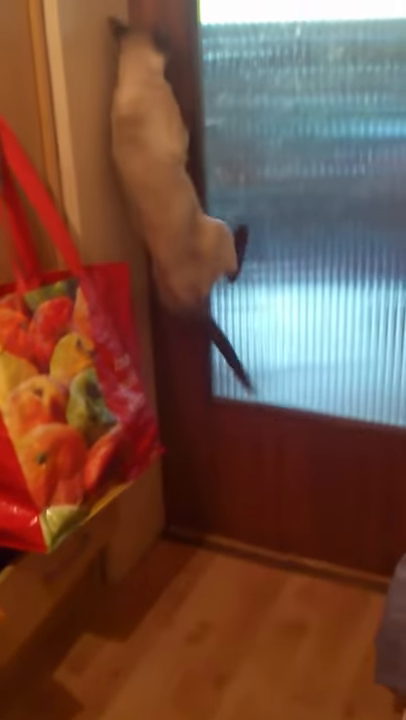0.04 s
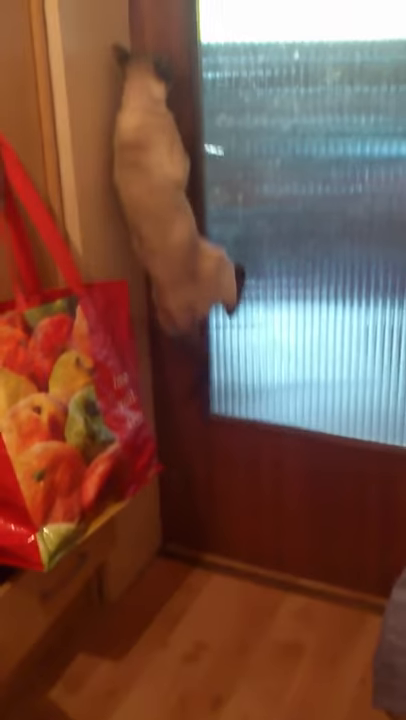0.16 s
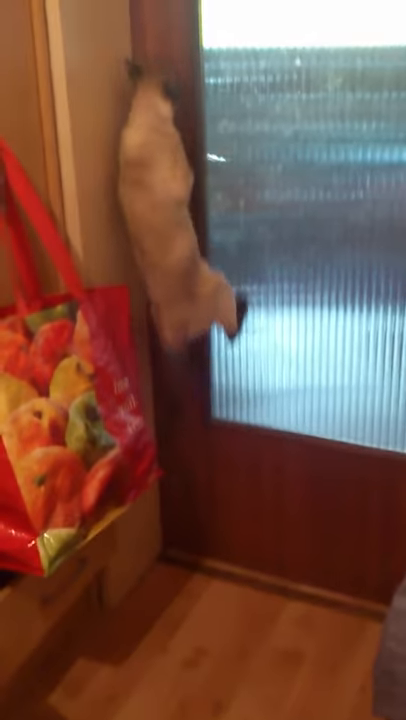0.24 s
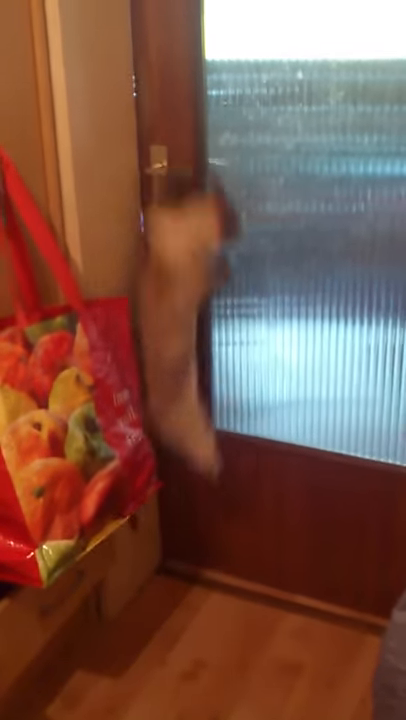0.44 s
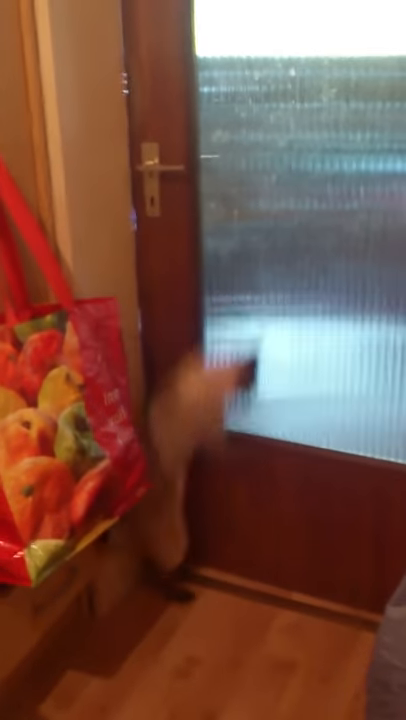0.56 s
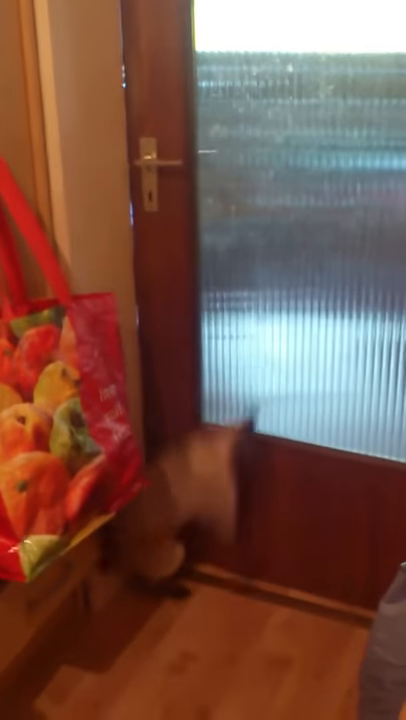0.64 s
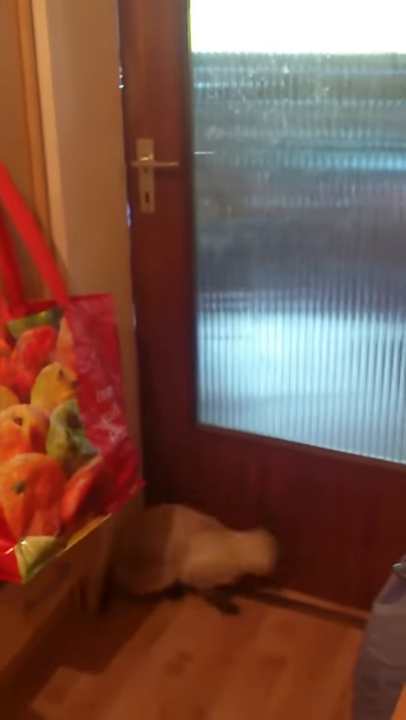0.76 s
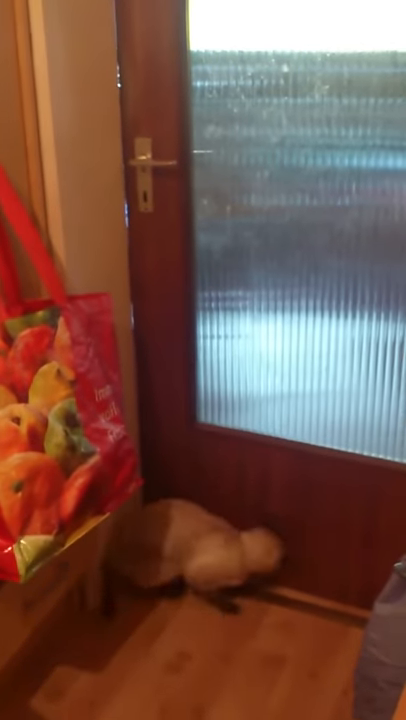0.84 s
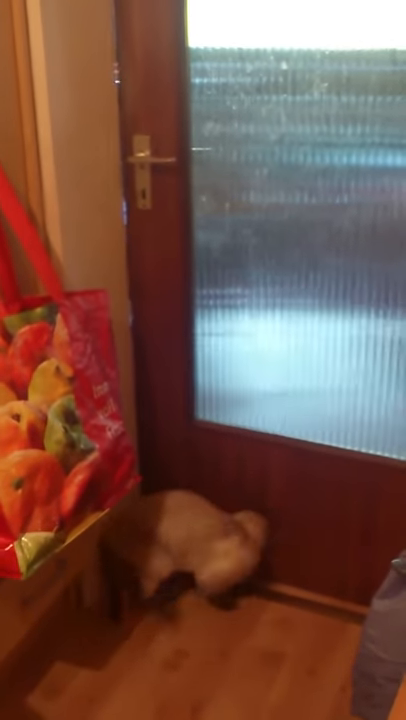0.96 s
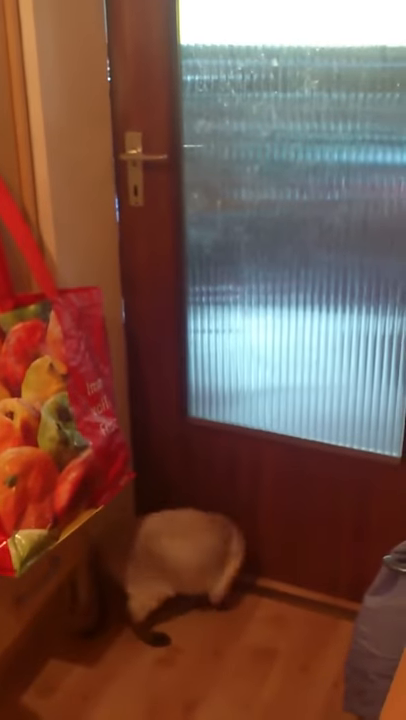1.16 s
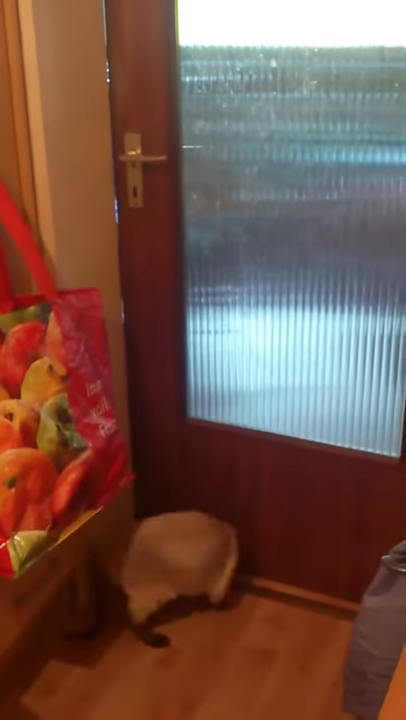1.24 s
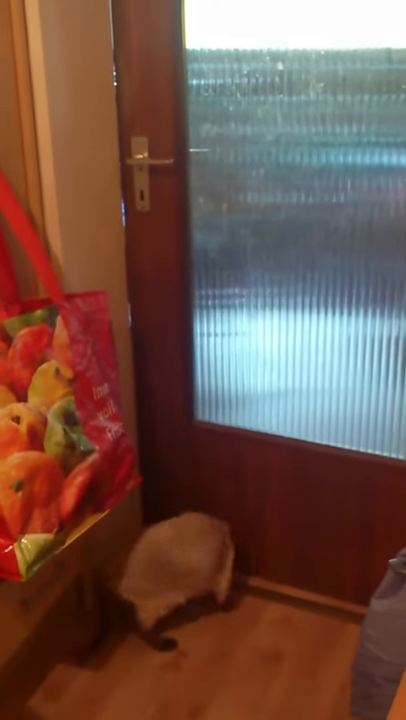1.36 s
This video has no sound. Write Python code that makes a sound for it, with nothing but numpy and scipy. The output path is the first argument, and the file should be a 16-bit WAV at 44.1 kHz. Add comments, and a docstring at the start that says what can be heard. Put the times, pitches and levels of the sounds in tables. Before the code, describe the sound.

A door handle creaks and clacks back as a cat drops off and lands.

```python
"""A cat drops from a door handle

A cat hangs from the handle of a glazed wooden door in a small hallway. The handle creaks by stick-slip
friction and the claws rasp off it. Impacts follow: the handle springs back, the latch clicks and the door
knocks in its frame. The cat lands front paws first, ringing the floor's modes, and takes a soft step.
A hand-held stereo recorder picks this up with a low rumble and faint hiss."""
import sys
import numpy as np
from scipy import signal
from scipy.fft import rfft, irfft
from scipy.io import wavfile
from scipy.ndimage import uniform_filter1d

SR = 44100
rng = np.random.default_rng(int(sys.argv[2]) if len(sys.argv) > 2 else 0)


def persist_wave(psi):
    """Save psi, clipped to +-1, as 16-bit WAV."""
    counts = np.round(np.clip(psi, -1, 1) * 32767).astype(np.int16)
    wavfile.write(sys.argv[1], SR, np.atleast_2d(counts).T)


N = 61739
FFT_SIZE = 65536
COHERENT_HZ = 815  # the two microphones hear alike below this


def claw_slide():
    """Sliding friction: claws scrape along the door as grainy noise."""
    # loudness of the scrape: time_s, level_db
    levels = [(0, -54.5), (.12, -59), (.19, -58), (.235, -49), (.27, -39), (.365, -50.5), (.46, -49),
              (.68, -60), (.73, -50.5), (.8, -64), (.88, -70)]
    # its spectrum: frequency_hz, gain_db
    spectrum = [(200, -1.5), (700, 8), (1500, -3), (3000, -2.5), (5000, 0.5), (7500, -2), (10000, 2),
                (12000, -6), (15500, -10.5)]
    grains = np.repeat(rng.standard_normal(N // 40 + 1), 40)[:N]
    grit = unit(np.exp(0.22 * grains))
    return unit(colour(diffuse() * grit, shape(spectrum))) * curve(levels)


def claw_slips():
    """Friction bursts: each slip has a band of rasp, lower for a slower claw."""
    # slips: start_s, level_db, rise_s, t60_s, rasp_hz
    slips = [(0.2636, -33.5, 0.0017, 0.19, 5030), (0.291, -34.5, 0.0023, 0.14, 2800),
             (0.3, -39.5, 0.0022, 0.18, 5000)]
    # spectrum beneath the rasp: frequency_hz, gain_db
    spectrum = [(450, -11), (700, -1), (1300, -4.5), (2000, -6.5), (5500, -2), (7500, -11), (10000, -8.5),
                (12000, -26), (15500, -48)]
    rasp_db, out = 5.5, 0
    for start, db, rise, t60, hz in slips:
        tone = shape(spectrum) + rasp_db * hump(freqs(), hz, octaves=0.23)
        out += burst(start, db, tone, rise, t60, crack=0)
    return out


def claw_clacks():
    """Hard contact: a brief force clacks and excites mainly the floor's high modes."""
    # claws striking the boards: start_s, level_db
    clacks = [(0.6535, -47), (0.6733, -42.5), (0.767, -51), (0.7694, -47.5)]
    # their spectrum: frequency_hz, gain_db
    spectrum = [(400, -5), (1000, -7.5), (1800, -2), (3100, -4), (4300, -3), (7000, -19.5), (10000, -11),
                (15500, -40)]
    contact = sum(burst(s, db, shape(spectrum), rise=0.00035, t60=0.21) for s, db in clacks)
    high_pass = lambda hz: 1 / (1 + (1500 / hz) ** 2)
    return contact + sum(undb(db - 2) * floor_boards(s, high_pass) for s, db in clacks)


def claw_ticks():
    """Light contact: claws touch down with bright, quickly damped ticks."""
    # touches: start_s, level_db, rise_s
    ticks = [(0.6522, -51.5, 0.00044), (0.6743, -45.5, 0.001), (0.804, -54.5, 0.00039),
             (0.991, -62.5, .006), (1.11, -59.5, 0.0025), (1.366, -65.5, 0.014)]
    # their spectrum: frequency_hz, gain_db
    spectrum = [(1000, -2.5), (3000, -8), (4500, 4.5), (7000, -2.5), (10000, 1), (12000, -7.5),
                (15500, -22)]
    return sum(burst(s, db, shape(spectrum), rise, t60=0.036) for s, db, rise in ticks)


def handle_creaks():
    """Stick-slip oscillation: the turning handle gives wavering tones and a rasp pulsed each cycle."""
    # creaks: start_s, length_s, pitch_hz, level_db
    creaks = [(0.207, 0.046, 550, -48.5), (0.265, 0.048, 675, -44.5)]
    jitter, overtone_db, rasp_db, rasp_hz = 0.037, -16, -2.5, 1960
    rasp_band = -10 * np.log10(1 + (2 * np.log2(freqs() / rasp_hz)) ** 6)
    out = 0
    for start, length, hz, db in creaks:
        phase = 2 * np.pi * np.cumsum(hz * (1 + jitter * wander(samples=150))) / SR
        tone = np.sin(phase) + undb(overtone_db) * sum(np.sin(k * phase) for k in range(2, 5))
        rasp = colour(diffuse() * (1 + np.sin(phase)), rasp_band)
        swell = abs(np.sin(np.pi * np.minimum(since(start) / length, 1)))
        out += undb(db) * (unit(tone) * np.sqrt(swell) + undb(rasp_db) * unit(rasp) * swell)
    return out


def handle_return():
    """Impact and rebound: the sprung handle hits its stop twice; the first hit rings the metal."""
    # hits on the stop: start_s, level_db
    hits = [(0.386, -25.5), (0.3914, -30.5)]
    # spectrum of the clack: frequency_hz, gain_db
    spectrum = [(570, -19.5), (740, -2), (860, 3), (1150, -5), (1650, -6), (2000, -17), (2400, -19),
                (2900, -8), (3700, -15), (4900, 1.5), (6200, -6), (7500, -13.5), (9000, -12), (10400, -8),
                (12000, -18.5), (15500, -30)]
    # modes of the metal: frequency_hz, gain_db, t60_s
    modes = [(793, -6, 0.2), (929, -3, 0.12), (2958, 2, 0.063), (4880, 3, 0.1), (5010, 3, .18),
             (5225, -16, 0.1), (5550, -1, 0.19), (10000, -7, 0.12)]
    clack = sum(burst(s, db, shape(spectrum), rise=0.00035, t60=0.2, crack=2.3) for s, db in hits)
    return clack + undb(-31.5) * ring(hits[0][0], modes, drive=lambda hz: 1)


def latch():
    """Impact: the latch clicks with sharp resonance peaks."""
    # spectrum of the click: frequency_hz, gain_db
    spectrum = [(200, -49), (600, -16), (850, -3.5), (1300, -15), (2500, -14.5), (3300, -2.5), (4700, 2.5),
                (5400, -7.5), (6100, -21), (6900, -24), (8100, 2.5), (9200, -5), (10500, -8.5),
                (11500, -17), (12500, -11.5), (15000, -33)]
    return burst(start=0.49, db=-31, tone=shape(spectrum), rise=0.0006, t60=0.22)


def frame_knock():
    """Impact: the door meets its frame in a broadband knock with a slower attack."""
    # spectrum of the knock: frequency_hz, gain_db
    spectrum = [(400, -22), (510, -2.5), (850, -3), (1300, -3.5), (2350, 1), (2800, -10.5), (3100, -4),
                (6300, -4.5), (7500, -12), (10000, -4), (12000, -16.5), (15500, -24.5)]
    return burst(start=0.538, db=-28, tone=shape(spectrum), rise=0.003, t60=0.18)


def door_leaf():
    """Free vibration: each jolt rings the leaf's modes, mainly those below the contact's cut-off."""
    # modes of the leaf: frequency_hz, gain_db, t60_s
    modes = [(89.8, -10, 0.9), (193.3, -14, .5), (309.3, -12.5, 0.36), (504.7, -2, 0.2),
             (628.7, -3.5, 0.17), (795, 2, 0.17), (937, -0.5, 0.29), (1028, 2, 0.32), (1506, 1, 0.2),
             (1985, 2, 0.15), (2162, -5, 0.083), (2330, -0.5, 0.17)]
    # jolts: start_s, level_db, cutoff_hz
    jolts = [(0.245, -30, 260), (0.295, -52, 2500), (0.541, -34.5, 5000)]
    return sum(undb(db) * ring(s, modes, lambda hz: 1 / (1 + (hz / cutoff) ** 2))
               for s, db, cutoff in jolts)


def paws():
    """Cushioned impact: each paw thuds and rings the boards; a softer contact gives a lower thud."""
    # footfalls: start_s, level_db, centre_hz, t60_s
    footfalls = [(0.654, -38.5, 693, 0.16), (0.6649, -42, 284, 0.067), (0.675, -42, 1220, 0.17),
                 (0.7701, -47, 890, 0.068), (0.779, -43.5, 256, 0.099), (1.1109, -50, 246, 0.099)]
    skirt_db, out = -33, 0
    for start, db, centre, t60 in footfalls:
        force = lambda hz: hump(hz, centre, octaves=0.71) + undb(skirt_db) / (1 + (hz / centre / 4) ** 2)
        out += burst(start, db, 20 * np.log10(force(freqs())), rise=0.00049, t60=t60)
        out += undb(db - 3) * floor_boards(start, force)
    return out


def floor_boards(start, drive):
    """Damping under load: the floor rings freely until the cat's full weight rests on it."""
    # modes of the boards: frequency_hz, gain_db, t60_s
    modes = [(95, 12.5, 0.26), (198.6, 2.5, 0.79), (248, 1, 0.12), (298.3, 11.5, 0.18), (389.6, 6, 0.12),
             (433.6, 12, 0.13), (565, 4.5, 0.21), (845.7, 8, .17), (1839, 6, 0.13), (2390, 2.5, .15),
             (3710, -2, 0.2)]
    loaded_s = 0.765
    return ring(start, modes, drive) * fade(since(max(start, loaded_s)), t60=0.26)


def door_sway():
    """Air displacement: the swaying door makes slow, uneven swings of pressure."""
    # strength of the swings: time_s, level_db
    levels = [(0, -58), (.19, -46), (.235, -43), (.27, -27), (.33, -43.5), (.45, -49), (.65, -53.5),
              (.9, -65.5)]
    sway_hz = 23.88 * (1 + 0.276 * wander(samples=1200))
    return unit(np.sin(2 * np.pi * np.cumsum(sway_hz) / SR)) * curve(levels)


def rumble():
    """Amplitude-modulated noise: a low rumble swells and ebbs."""
    # loudness of the rumble: time_s, level_db
    levels = [(0, -51), (.19, -57.5), (.27, -38), (.35, -50.5), (.5, -56), (.8, -52.5), (.92, -71),
              (1.4, -68)]
    # its spectrum: frequency_hz, gain_db
    spectrum = [(20, -11), (40, -5), (52, -16.5), (90, 3.5), (140, -7.5), (300, -19), (1000, -51.5)]
    return unit(colour(diffuse(), shape(spectrum))) * curve(levels)


def hiss():
    """Stationary noise: a faint, steady floor of sound."""
    # spectrum of the noise floor: frequency_hz, gain_db
    spectrum = [(35, -36), (60, -0.5), (142, -8.5), (308, -2.5), (354, -9), (3040, -18), (4970, -18),
                (10500, -19), (16000, -20.5)]
    return undb(-63) * unit(colour(diffuse(), shape(spectrum)))


def burst(start, db, tone, rise, t60, crack=1):
    """Impulse response: direct crack, dense ring and room tail; db is the energy spread over 50 ms."""
    t = since(start)
    attack = 1 - np.exp(-t / rise)
    early_reflections = 0.88 * fade(t, t60=0.017)
    room_tail = undb(-9) * fade(t, t60=0.24)
    x = diffuse() * attack * np.hypot(fade(t, t60) + early_reflections, room_tail)
    x[:, int((start + rise) * SR)] += crack * undb(-23) * np.sqrt(np.sum(x ** 2) / 2)  # direct sound
    # The noise's own ripple is divided out, so that tone (dB over frequency) sets the spectrum.
    ripple = uniform_filter1d(np.mean(abs(rfft(x, FFT_SIZE)) ** 2, axis=0), size=200)
    return undb(db) * unit(colour(x, tone - 10 * np.log10(ripple))) * np.sqrt(0.05 * SR / N)


def ring(start, modes, drive):
    """Modal superposition: damped sines weighted by drive(hz); high ones differ in phase left to right."""
    t, out = since(start), 0
    build_cycles = 1.33
    for hz, db, t60 in modes:
        detune, skew = rng.standard_normal(2)
        lag = np.array([[1], [-1]]) * skew * min(hz / COHERENT_HZ, 2) / 2
        flutter = 1 + 0.34 * wander(samples=500)  # from loose joints
        envelope = (1 - np.exp(-t * hz / build_cycles)) * flutter * fade(t, t60)
        phase = 2 * np.pi * hz * (1 + 0.0011 * detune) * t + lag
        out += undb(db) * drive(hz) * envelope * np.sin(phase)
    return out


def diffuse():
    """Diffuse field: white stereo noise, coherent in the bass and unrelated in the treble."""
    mid, side = np.exp(2j * np.pi * rng.random((2, FFT_SIZE // 2 + 1)))
    coherence = 1 / (1 + (freqs() / COHERENT_HZ) ** 2)
    spectra = mid * np.sqrt(1 + coherence) + np.array([[1], [-1]]) * side * np.sqrt(1 - coherence)
    return unit(irfft(spectra)[:, :N])


def microphone_ports(sound):
    """Level difference: the two ports share the power unequally at each frequency."""
    # balance of the ports: frequency_hz, left_minus_right_db
    balance = [(200, 1), (1200, 1), (2300, 2), (3500, -0.5), (4900, -6.5), (6300, 2), (7600, 9.5),
               (10000, 17), (13000, 10), (15500, -0.5)]
    shares = [2 / (1 + undb(-2 * side * shape(balance))) for side in (1, -1)]
    return np.array([colour(x, 10 * np.log10(share)) for x, share in zip(sound, shares)])


def colour(x, db):
    """Minimum-phase filter with the given gain over frequency."""
    cepstrum = irfft(np.log(undb(db)))
    cepstrum[1:FFT_SIZE // 2] *= 2
    cepstrum[FFT_SIZE // 2 + 1:] = 0
    response = irfft(np.exp(rfft(cepstrum)))[:FFT_SIZE // 2]
    return irfft(rfft(x, 2 * FFT_SIZE) * rfft(response, 2 * FFT_SIZE))[..., :N]


def freqs():
    """Frequency axis of the filters in Hz."""
    return np.maximum(np.arange(FFT_SIZE // 2 + 1) * SR / FFT_SIZE, 1)


def shape(points):
    """Decibels over frequency from (frequency_hz, gain_db) points."""
    hz, db = np.array(points).T
    return np.interp(np.log(freqs()), np.log(hz), db)


def hump(hz, centre, octaves):
    """Gaussian bell over log frequency, 1 at its centre."""
    return np.exp(-0.5 * (np.log2(hz / centre) / octaves) ** 2)


def curve(points):
    """Gain over time from (time_s, level_db) points."""
    return undb(np.interp(since(0), *np.array(points).T))


def wander(samples):
    """Slow fluctuation: a moving average of noise, at rms 1."""
    return unit(uniform_filter1d(rng.standard_normal(N), size=samples))


def since(start):
    """Seconds since a moment, zero before it."""
    return np.maximum(np.arange(N) / SR - start, 0)


def fade(t, t60):
    """Exponential decay, 60 dB in t60 seconds."""
    return np.exp(-np.log(1000) * t / t60)


def undb(db):
    """Decibels to gain."""
    return 10 ** (np.asarray(db) / 20)


def unit(x):
    """Scale to rms 1."""
    return x / np.sqrt(np.mean(x ** 2) + 1e-20)


def scene():
    """Superposition: cat and door through the microphone ports, over rumble, sway and hiss."""
    claws = claw_slide() + claw_slips() + claw_clacks() + claw_ticks()
    door = handle_creaks() + handle_return() + latch() + frame_knock() + door_leaf()
    return microphone_ports(claws + door + paws()) + rumble() + door_sway() + hiss()


def record(dry):
    """Band limiting: the recorder's steep low-pass filter cuts the top."""
    cutoff_hz = 15900
    return signal.sosfilt(signal.ellip(10, 0.2, 80, cutoff_hz, fs=SR, output="sos"), dry)


dry = scene()
out = record(dry)
persist_wave(out)
```